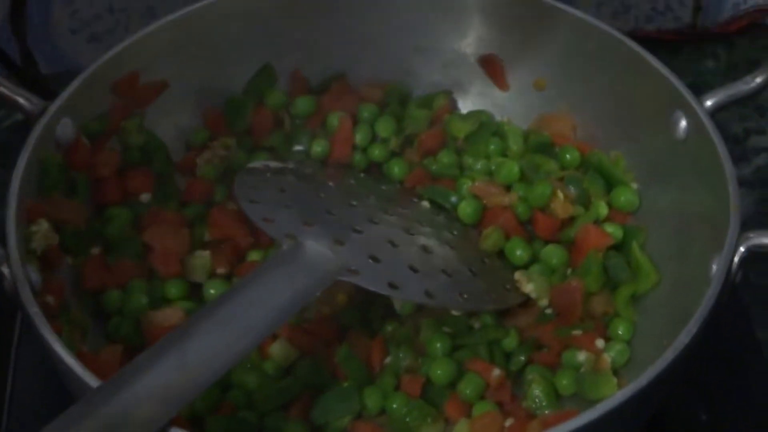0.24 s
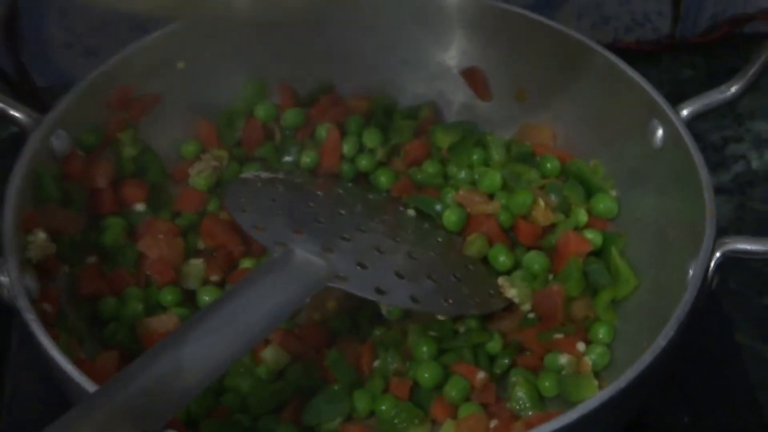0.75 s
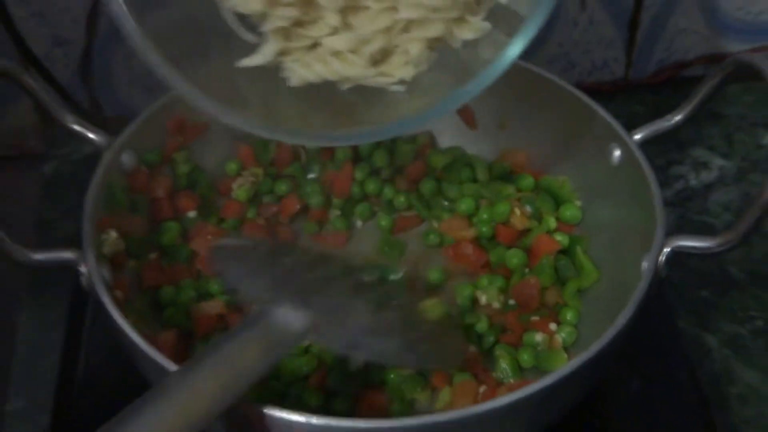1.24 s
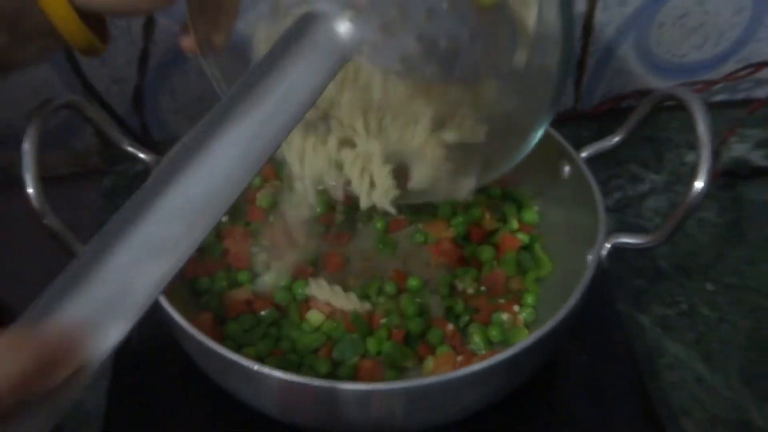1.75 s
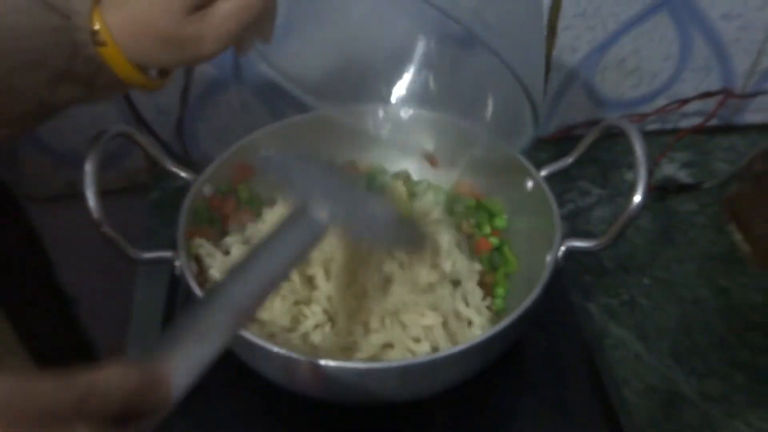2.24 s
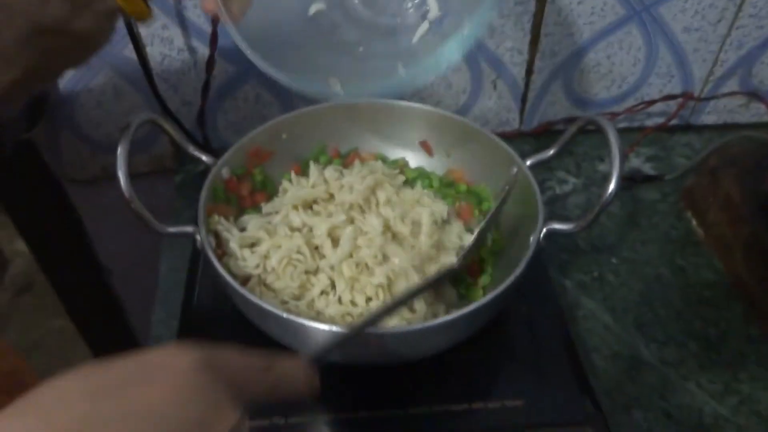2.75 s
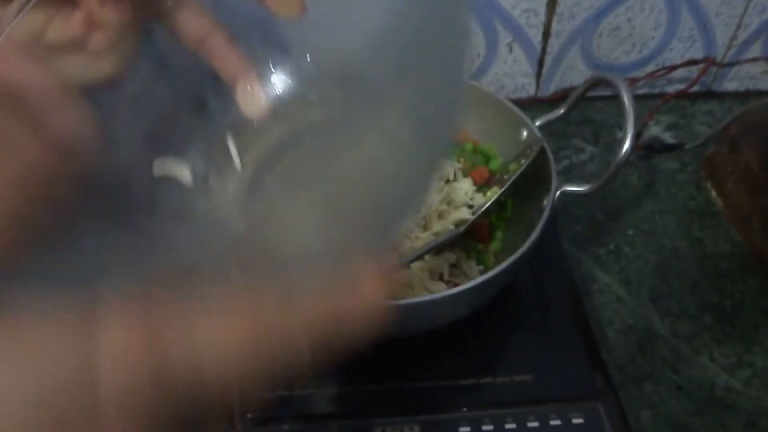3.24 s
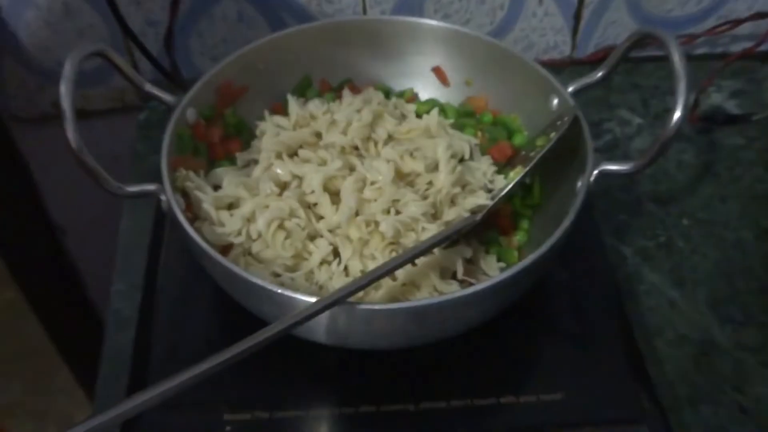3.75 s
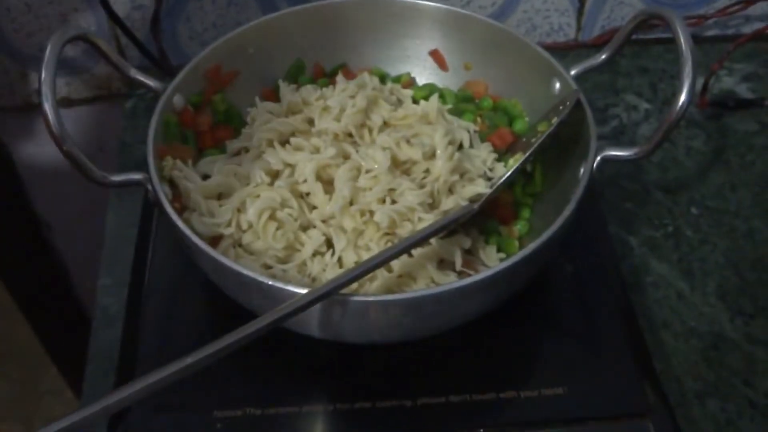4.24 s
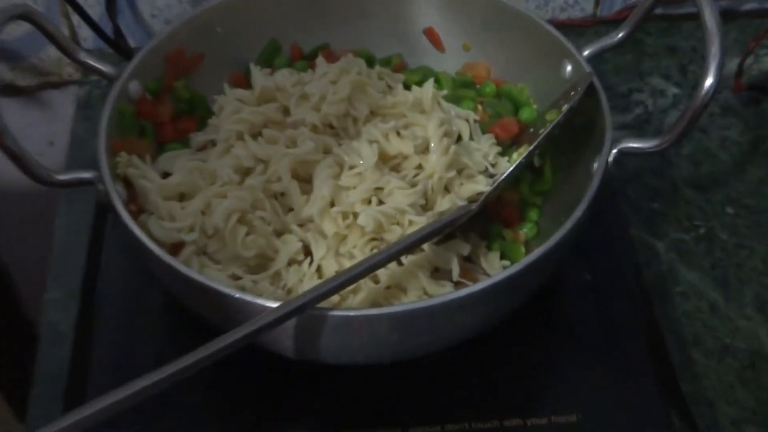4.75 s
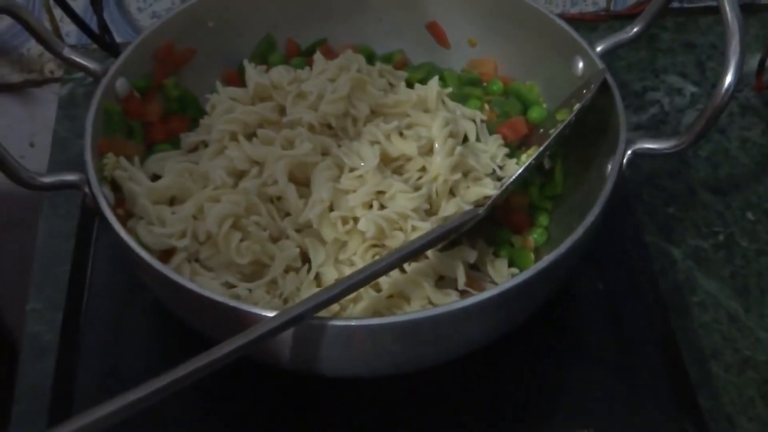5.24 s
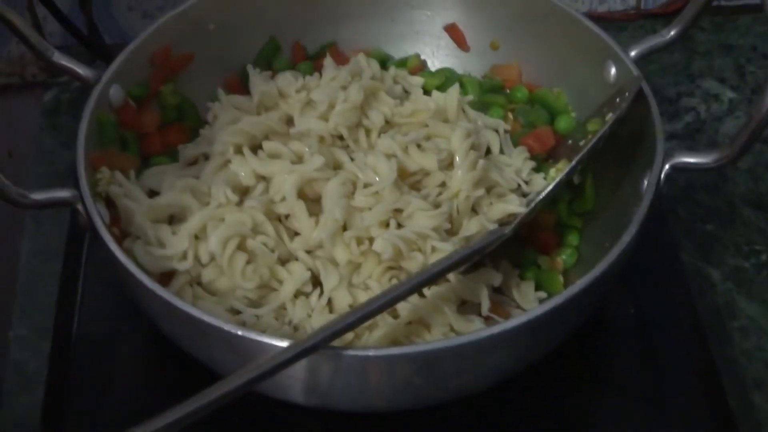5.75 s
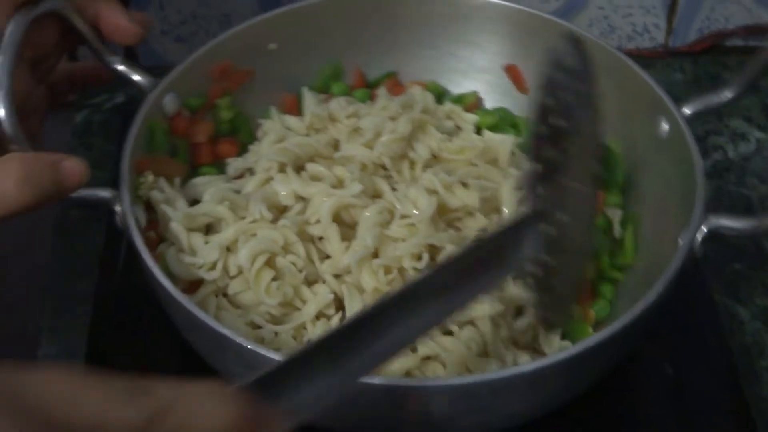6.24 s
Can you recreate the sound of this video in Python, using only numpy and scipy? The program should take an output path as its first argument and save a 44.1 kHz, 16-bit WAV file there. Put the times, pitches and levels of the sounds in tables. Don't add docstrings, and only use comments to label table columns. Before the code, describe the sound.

A close, slightly right-leaning stereo sound in a small tiled kitchen with short echoes. Oil fizzes densely and rather quietly from the start, with crisp single spits throughout, over a steady airy fan whir with a mid-low hum and faint hiss. Around 0.96 s the pan gets a sharp metallic tick and dull knock. At 1.83 s the skimmer clinks brightly on a glass bowl; from 2.0 s pasta slides out with a soft scrape and the sizzle surges. Another glass clink at 2.4 s, then skimmer and pan-wall clanks at 2.8-2.9 s amid stronger frying, which dips around 3.2 s and builds again. The bowl is set down at 4.2 s, a glass lands with a heavy, ringing thud at 5.0 s, a jar thumps at 5.28 s. Handle ticks at 5.9-6.0 s lead to bright skimmer clanks at 6.28 s and two short, gritty pan scrapes until 6.5 s.

```python
import sys
import numpy as np
from scipy import signal
from scipy.io import wavfile
from scipy.ndimage import uniform_filter1d

SR = 44100
rng = np.random.default_rng(int(sys.argv[2]) if len(sys.argv) > 2 else 0)


def log_audio(samples):
    frames = np.atleast_2d(samples).T
    limited = np.clip(frames, -1, 1)
    pcm = np.round(limited * 32767).astype(np.int16)
    wavfile.write(sys.argv[1], SR, pcm)


def gain_from_decibels(decibels):
    exponent = np.asarray(decibels, float) / 20
    return 10 ** exponent


N = 286650


def evened(x):
    return x / np.sqrt(np.mean(x ** 2) + 1e-20)


def read(points, hz):
    f, value = np.transpose(points)
    return np.interp(np.log(hz + 1), np.log(f + 1), value)


def add(mix, s, sound):
    part = mix[round(s * SR):][:len(sound)]
    part += sound[:len(part)]


def resonate(x, hz, width):
    r, turn = np.exp(-np.pi * width / SR), np.exp(2j * np.pi * hz / SR)
    return 2 * signal.lfilter([1 - r], [1, -r * turn], x).real


# pitch in Hz, likeness (1 = the same).
SAME = [(40, 0.84), (250, 0.99), (1000, 0.92), (4000, 0.92), (7500, 0.92), (8500, 0.8), (15000, 0.55)]


def field(z, db, swell_db, patchy_db):
    hz = np.fft.rfftfreq(512, 1 / SR)
    patches = rng.standard_normal(z.shape[:0:-1]).T
    patches = uniform_filter1d(patches, size=7, axis=0)
    patches = evened(uniform_filter1d(patches, size=16, axis=1))
    flicker = evened(uniform_filter1d(rng.standard_normal(z.shape[2]), size=12))
    same = np.clip(read(SAME, hz), -1, 1)[:, None]
    mid = np.sqrt((1 + same) / 2) * z[0]
    side = np.sqrt((1 - same) / 2) * z[1]
    gain = gain_from_decibels(db + swell_db * flicker + patchy_db * patches)
    pair = np.array([mid + side, mid - side]) * gain
    return signal.istft(pair, nperseg=512, noverlap=384)[1][:, :N]


# time in seconds, level in dB.
HEAT = [(0.0, -41.5), (0.72, -42), (1.77, -40.5), (2.0, -36.5), (2.045, -32.5), (2.21, -35), (2.645, -35),
        (2.67, -30.5), (2.775, -31), (2.84, -30.5), (3.15, -36.5), (3.46, -36.5), (3.78, -34),
        (5.01, -31.5), (5.36, -32.5), (6.3, -32), (6.46, -30), (6.5, -29)]
# pitch in Hz, strength in dB per Hz.
FIZZ = [(710, -17.5), (1200, -6.5), (1520, -10.5), (1850, -4.5), (2370, -6), (2840, -6.5), (3170, -3.5),
        (4570, -1.5), (5320, -4), (6250, -5), (7040, -11.5), (8100, -9), (9020, -7.5), (11900, -14),
        (15800, -18.5)]


def frying(per_s=7000, spread_db=3.5):
    size_db = spread_db * np.minimum(rng.exponential(1, (2, N)), 3.5)
    bursts = gain_from_decibels(size_db) * (rng.random((2, N)) < per_s / SR)
    bursts = evened(bursts * rng.choice([-1., 1.], (2, N)))
    bursts = bursts + 0.71 * rng.standard_normal((2, N))
    hz, t, z = signal.stft(evened(bursts), SR, nperseg=512, noverlap=384)
    heat_db = np.interp(t, *np.transpose(HEAT))
    top_db = np.interp(t, [1.95, 2.06], [18.5, 14])
    top = np.clip((hz[:, None] - 6000) / 2500, 0, 1)
    level_db = heat_db + (1 - top) * 10.43 + top * top_db
    return field(z, read(FIZZ, hz)[:, None] + level_db, swell_db=0.83, patchy_db=1.5)


def spit(db, hz, crack):
    t = np.arange(600) / SR
    bubble = np.sin(2 * np.pi * hz * t) * np.exp(-t * hz / 3.4)
    bubble = bubble * (1 - np.exp(-t * hz / .5))
    snap = 1.3 * np.exp(-t / 0.00022) + 0.49 * np.exp(-t / 0.0084)
    grit = uniform_filter1d(rng.standard_normal(600), size=2)
    return gain_from_decibels(db) * (bubble + abs(crack) * grit * snap)


# start in seconds, peak in dB, pitch in Hz, share of crack (0 to 1).
SPITS = [(0.0396, -26.5, 1504, 0.8), (0.0941, -14, 3330, 0.4), (0.141, -15.5, 3460, 0.24),
         (0.609, -13, 9600, 0.07), (0.6887, -15, 9150, 0.23), (0.6903, -19.5, 4730, 0.96),
         (0.884, -22, 3100, 0.6), (1.4375, -19.5, 5300, 0.4), (1.9288, -20, 4500, 0.7),
         (2.424, -18, 2580, 0.1), (3.555, -17, 3930, 0.5), (3.663, -17, 4030, 0.46),
         (3.6886, -14.5, 4830, 0.6), (3.6892, -24, 1910, 0), (3.7434, -10.5, 9810, 0.1),
         (4.0142, -8, 8400, 0.02), (4.087, -16, 4480, 0.24), (4.4284, -17, 4230, 0.2),
         (5.105, -14, 4890, 0.2), (5.2117, -16, 1980, 0.1), (5.2122, -22, 3400, .1), (4.9989, -8, 1960, 0),
         (5.138, -20, 4100, 0), (5.0035, -20.5, 600, 0), (5.013, -9, 1350, 0.1), (5.033, -11, 750, 0),
         (5.064, -18, 714, 0.1), (0.9637, -12, 4150, .1), (.9648, -13, 8150, 0), (2.818, -14, 2900, 0.6),
         (6.4425, -10, 2260, .15), (6.483, -10, 3600, 0), (1.09, -25, 1920, .1), (6.235, -11, 7800, 0.1),
         (4.344, -25, 4500, .2), (6.054, -20, 4130, 1), (6.123, -9, 8600, 0)]


def spits():
    oil = np.zeros(N)
    for s, *pop in SPITS:
        add(oil, s, spit(*pop))
    return oil


def knock(ring_db, clatter_db, t60, blow_hz, modes):
    t = np.arange(SR // 2) / SR
    low_hz, high_hz = blow_hz
    band = signal.butter(3, [low_hz, high_hz], "band", fs=SR, output="sos")
    grit = rng.standard_normal((1 + len(modes), len(t)))
    build = 1 - np.exp(-t * high_hz / 7.4) + 2.0 * np.exp(-t / 0.00029)
    level = 1 / np.sqrt((high_hz - low_hz) / (SR / 2))
    clatter = signal.sosfilt(band, level * grit[0] * build * gain_from_decibels(clatter_db - 60 * t / t60))
    chatter = 1 + .3 * evened(uniform_filter1d(grit, size=300, axis=1))[1:]
    ring = sum(gain_from_decibels(db - 60 * t / last) * shake * np.sin(2 * np.pi * tone * t)
               for (tone, db, last), shake in zip(modes, chatter))
    return clatter + gain_from_decibels(ring_db) * ring * (1 - np.exp(-t / 0.00098))


# lowest Hz, highest Hz.
BUMP_HZ = (246, 640)
THUD_HZ = (236, 1850)
RAP_HZ = (567, 4100)
DULL_HZ = (238, 1370)
TAP_HZ = (1240, 2820)
SLAP_HZ = (600, 1960)
PING_HZ = (2850, 4650)
CLINK_HZ = (1290, 14300)
TICK_HZ = (2960, 14400)
# pitch in Hz, level in dB, seconds to fall by 60 dB.
BOWL_BASE = [(478, -17.5, 0.056), (298, -29.5, .15)]
BOWL_EDGE = [(4720, -16, .03)]
BOWL_ROCK = [(1540, -29, .12), (4000, -25, .12), (3300, -31, .15), (510, -39, 0.15)]
BOWL_RIM = [(2570, -26.5, .16), (3480, -29, 0.1), (3700, -29, .15), (4750, -21, 0.068), (5350, -29, .1),
            (5590, -26, .14), (8150, -27, .12), (8950, -21, .1), (9600, -25, .1), (10250, -21, 0.1),
            (11600, -30, .1), (12730, -28, .05), (13400, -22, .05)]
RIM_BOUNCE = [(2530, -26, 0.16), (3470, -26, 0.21), (3700, -32, .12), (2900, -29, .1), (4800, -27, 0.053),
              (5590, -23, .15), (8160, -31, .2), (9670, -28, 0.091), (10650, -26, .1), (11620, -24, 0.1),
              (14500, -25, .05)]
BOWL = [(772, -28.5, 0.17), (1440, -23, 0.22), (2477, -20, 0.11), (2610, -25, 0.13), (3484, -26.5, 0.17),
        (4590, -23.5, 0.14), (6300, -33, .1), (7900, -27, .1), (9070, -14.5, 0.079), (10500, -22, 0.088),
        (11440, -23, 0.061), (13600, -30, 0.067)]
BOWL_FREED = [(772, -32, 0.46), (1414, -30, 0.38), (2010, -30, 0.5), (2520, -19.5, 0.16), (2600, -29, .2),
              (4480, -38, 0.17), (8140, -25, 0.2), (9800, -28, 0.27)]
PAN = [(1034, -33, 0.17), (2013, -32, 0.17), (3180, -27, 0.22), (3320, -28, 0.091), (3330, -31, 0.12),
       (3900, -28, 0.046), (4290, -27, 0.11), (4720, -29, 0.084), (6200, -28, 0.048), (8100, -18.5, 0.034),
       (8700, -27, .18), (9290, -21, 0.11), (9500, -25, 0.12), (12600, -26, .05)]
PAN_TOUCH = [(5220, -37, 0.087), (5780, -33, .08), (8700, -42, .05), (14800, -33, .05)]
PAN_WALL = [(797, -37, 0.39), (1470, -20, 0.07), (1805, -18, 0.064), (2022, -18.5, 0.072), (2030, -33, .1),
            (2260, -21.5, 0.07), (2790, -32, 0.13), (3207, -25.5, 0.18), (4040, -19.5, .04),
            (4720, -18.5, 0.046)]
JAR = [(750, -17.5, 0.037)]
GLASS = [(1337, -18, 0.25), (696, -14, 0.24), (348, -10, 0.098)]
GLASS_RIM = [(4890, -25.5, 0.15), (4880, -38, 0.092), (8100, -29, 0.083)]
SKIMMER = [(1350, -29, 0.2), (2323, -20.5, 0.38), (2220, -33, 0.46), (2990, -28, 0.18), (5220, -27, .15),
           (5580, -25, .1), (6800, -34, .1), (6830, -27, .1), (7940, -21, 0.1), (14600, -28, .07)]
SKIMMER_BOUNCE = [(2303, -19, 0.2), (3230, -26, 0.072), (3850, -31, .1), (5100, -31, .1), (7010, -28, .08),
                  (7950, -29, .1)]
SKIMMER_EDGE = [(3500, -24, 0.15), (4100, -17, .03), (4500, -34, .1), (5210, -20, 0.2), (5820, -25, 0.16),
                (6900, -18.5, 0.21), (10200, -20, 0.095), (11000, -22, 0.11), (11800, -28, .06),
                (13000, -25, .05)]
EDGE_BOUNCE = [(1036, -30.5, .15), (2260, -25, 0.086), (3350, -23, .16), (5130, -27, .08),
               (5810, -20, 0.11), (6960, -34, .2), (408, -36, .3)]
HANDLE = [(1120, -29, .06), (3100, -31, 0.16), (4100, -27, .06), (8400, -19, .05), (7340, -17, 0.049),
          (9330, -23, 0.12)]
HANDLE_BOUNCE = [(1090, -26, 0.095), (2490, -22, 0.035), (3130, -30, .08), (6100, -18, 0.035),
                 (7500, -25, 0.049), (8300, -24, .04)]
HANDLE_TIP = [(9340, -18, 0.025), (8700, -15.5, 0.022), (7600, -15, 0.025), (13000, -24, 0.045),
              (4100, -26, .06)]
BLADE_LOW = [(1600, -25.5, .15), (282, -31.5, 0.32)]
BLADE_FLAT = [(750, -21, 0.17), (1014, -28, 0.097), (1240, -30, 0.088), (2340, -29, 0.074),
              (5240, -22, 0.085)]
BLADE_TIP = [(2100, -28, 0.089), (3550, -23, 0.092), (5240, -33, 0.084), (6800, -25, .09)]
BLADE_HEEL = [(2090, -21.5, 0.086), (2450, -22, .1), (1350, -32, .12), (3400, -30, .1)]
# start in seconds, ring in dB, clatter in dB, seconds for the clatter to fall by 60 dB,
# kind of blow (Hz band), tones that ring.
BLOWS = [(0.9647, 0, -20, 0.027, TICK_HZ, []), (.964, 1, -22, 0.076, PING_HZ, PAN),
         (0.989, 0, -24, 0.066, DULL_HZ, []), (1.014, 0, -30, 0.31, THUD_HZ, []),
         (1.030, 2, -35, 0.092, TICK_HZ, PAN_TOUCH), (1.833, 0, -21, 0.1, CLINK_HZ, BOWL_RIM),
         (1.849, -3.5, -24.5, 0.3, CLINK_HZ, RIM_BOUNCE), (1.897, -14, -34, .15, TICK_HZ, BOWL_RIM),
         (2.403, 0, -19, 0.087, CLINK_HZ, [(2490, -21, .1)]), (2.7905, 0, -17, 0.055, TICK_HZ, []),
         (2.804, -3, -28, 0.1, CLINK_HZ, SKIMMER_BOUNCE), (2.039, 0, -31.5, 0.61, TICK_HZ, []),
         (2.396, 0.5, -18, 0.1, CLINK_HZ, BOWL), (2.434, -4, -35, 0.29, CLINK_HZ, BOWL_FREED),
         (2.791, -1, -24.5, 0.095, CLINK_HZ, SKIMMER), (2.897, 1, -18, 0.14, TAP_HZ, PAN_WALL),
         (2.898, 0, -24.5, 0.2, DULL_HZ, []), (4.225, 1.5, -27, 0.27, BUMP_HZ, BOWL_BASE),
         (4.226, -2, -25, 0.2, TICK_HZ, BOWL_EDGE), (4.230, 0, -25, 0.24, RAP_HZ, []),
         (4.246, 0, -29, 0.23, RAP_HZ, BOWL_ROCK), (4.977, 0, -28, 0.3, RAP_HZ, []),
         (4.998, -5.5, -14.5, 0.23, THUD_HZ, GLASS), (5.012, 0, -17.5, 0.24, THUD_HZ, []),
         (5.002, 1.5, -42, .1, PING_HZ, GLASS_RIM), (5.018, -0.5, -44, .1, PING_HZ, GLASS_RIM),
         (5.042, -6, -43, .1, PING_HZ, GLASS_RIM), (5.033, 0, -29, .15, SLAP_HZ, []),
         (5.048, 0, -24, 0.36, SLAP_HZ, []), (5.275, 3.5, -21, 0.24, DULL_HZ, JAR),
         (5.925, 2.5, -24.5, 0.11, CLINK_HZ, HANDLE), (5.929, 0, -22.5, 0.1, RAP_HZ, HANDLE_BOUNCE),
         (6.170, 0, -32, .2, PING_HZ, []), (5.9975, -2, -23.5, 0.09, TICK_HZ, HANDLE_TIP),
         (6.276, -1.5, -19.5, 0.45, CLINK_HZ, SKIMMER_EDGE), (6.295, -1, -28, 0.18, RAP_HZ, EDGE_BOUNCE),
         (6.349, -3.5, -30, .1, THUD_HZ, BLADE_LOW), (6.376, -2.5, -30, .1, CLINK_HZ, BLADE_FLAT),
         (6.385, -3, -30, 0.092, RAP_HZ, [(2340, -27, .08), (5240, -23, .08)]),
         (6.401, 1.5, -34, .1, CLINK_HZ, BLADE_TIP), (6.442, -14, -33, 0.067, RAP_HZ, BLADE_FLAT),
         (6.476, -7, -34, .06, RAP_HZ, BLADE_HEEL), (6.367, 0, -33, .15, TICK_HZ, []),
         (6.464, -2, -36, .1, TAP_HZ, BLADE_HEEL), (6.491, 0, -37, .1, RAP_HZ, BLADE_HEEL)]


def knocks():
    near = np.zeros(N)
    muffled_s = 2.422
    for s, *blow in BLOWS:
        sound = knock(*blow)
        if s < muffled_s:
            sound[round((muffled_s - s) * SR):] *= gain_from_decibels(-27)
        add(near, s, sound)
    return near


def scrape(rows, peaks):
    s, db = np.transpose(rows)
    t = np.arange(s[0], s[-1], 1 / SR)
    jerks = evened(uniform_filter1d(rng.standard_normal(len(t)), size=60))
    grit = rng.standard_normal(len(t)) * gain_from_decibels(2.0 * jerks)
    body = sum(gain_from_decibels(top_db) * evened(resonate(grit, hz, width)) for hz, width, top_db in peaks)
    rasp = evened(resonate(grit, 4200, 2900))
    fade_in = np.clip((t - s[0]) / 0.0048, 0, 1)
    return s[0], gain_from_decibels(np.interp(t, s, db)) * evened(evened(body) + 1.1 * rasp) * fade_in


# time in seconds, level in dB.
SCRAPE = [
    [(6.345, -35), (6.385, -23), (6.425, -27.5), (6.44, -31)],
    [(6.44, -23.5), (6.5, -30)],
    [(2.04, -40), (2.3, -39.5), (2.62, -44)],
]
# pitch in Hz, width in Hz, level in dB.
SCRAPED = [
    [(715, 20, -2), (1240, 40, -8), (2400, 93, 2), (2850, 110, 3), (3470, 99, -3), (3800, 47, -5),
     (5330, 38, 0), (6850, 91, 5), (9200, 39, -17)],
    [(720, 28, -4), (2220, 150, 8), (3400, 29, 3), (4230, 36, -17), (5300, 96, -13), (7000, 36, 5),
     (8110, 165, -20), (9800, 56, -16)],
    [(1940, 100, 5), (1400, 80, -6), (4500, 300, -3)],
]


def scrapes():
    near = np.zeros(N)
    for rows, peaks in zip(SCRAPE, SCRAPED):
        add(near, *scrape(rows, peaks))
    return near


def boom(db, t60):
    t = np.arange(SR // 2) / SR
    shudder = resonate(rng.standard_normal(len(t)), 95, 75)
    shudder = evened(resonate(shudder, 95, 75))
    return gain_from_decibels(db - 60 * t / t60) * shudder * (1 - np.exp(-t / 0.0095))


# start in seconds, level in dB, seconds to fall by 60 dB.
BOOMS = [
    (1.0, -59, 1.0),
    (2.4, -62, 0.35),
    (2.901, -63, .5),
    (4.231, -62, 0.88),
    (2.79, -62, .4),
    (5.001, -46.5, 0.45),
    (5.28, -55, 0.6),
    (6.33, -60, 0.65),
]


def booms():
    counter = np.zeros(N)
    for s, *shudder in BOOMS:
        add(counter, s, boom(*shudder))
    return counter


# pitch in Hz, seconds to fall by 60 dB.
KITCHEN = [(200, 0.22), (1500, 0.25), (6000, 0.24), (15000, 0.071)]


def kitchen(x):
    taps = np.zeros((2, SR // 2))
    at = np.arange(200, SR // 2 - 20, 20)
    at = at + rng.integers(0, 20, (2, len(at)))
    np.put_along_axis(taps, at, rng.choice([-1., 1.], at.shape), 1)
    taps = taps + 0.64 * taps[::-1]
    hz, t, z = signal.stft(taps, SR, nperseg=256)
    tail = signal.istft(z * gain_from_decibels(-60 * t / read(KITCHEN, hz)[:, None]), SR, nperseg=256)[1]
    return signal.fftconvolve(x[None], tail / np.linalg.norm(tail[0]), axes=1)[:, :N]


# pitch in Hz, strength in dB per Hz.
WHIR = [(20, -52), (45, -33), (85, -25), (150, -28), (190, -19), (280, -6.5), (403, -2.5), (479, -7.5),
        (805, -5), (1020, -6.5), (1250, -9.5), (2040, -11.5), (2700, -41), (4500, -60)]
# pitch in Hz, width of the wavering in Hz, level in dB.
HUM = [(202.8, 7.6, -61), (409.7, 15.5, -43), (808.6, 28, -49), (1019.5, 27, -48.5), (346, 11, -60),
       (544, 40, -55)]


def fan():
    air = np.fft.rfft(rng.standard_normal((2, N)))
    air = evened(np.fft.irfft(air * gain_from_decibels(read(WHIR, np.fft.rfftfreq(N, 1 / SR))), N))
    z = signal.stft(air, SR, nperseg=512, noverlap=384)[2]
    rush = field(z, -39.5, swell_db=1.32, patchy_db=0.0)
    t, tones = np.arange(N) / SR, 0
    for hz, width, db in HUM:
        waver = resonate(rng.standard_normal(N), hz, width)
        waver = evened(resonate(waver, hz, width))
        tones = tones + gain_from_decibels(db) * (0.5 * waver + np.sin(2 * np.pi * (hz * t + rng.random())))
    return rush + tones


def scene():
    oil = spits()
    near = knocks() + scrapes()
    direct = near * gain_from_decibels(np.array([[-.3], [.3]])) + oil * gain_from_decibels(np.array([[-1.5], [1.5]]))
    direct = direct + np.array([[.2], [-.2]]) * np.gradient(near)
    pan = direct + gain_from_decibels(-9.0) * kitchen(near + 0.63 * oil) + frying()
    small = signal.butter(5, 215, "high", fs=SR, output="sos")
    return signal.sosfilt(small, pan) + booms() + fan()


def top_cut(x):
    return signal.sosfilt(signal.butter(12, 16480, fs=SR, output="sos"), x)


def record(dry):
    treble = signal.butter(2, 7000, "high", fs=SR, output="sos")
    hiss = signal.sosfilt(treble, rng.standard_normal(dry.shape))
    heard = dry * gain_from_decibels(np.array([[-.35], [.35]])) + gain_from_decibels(-43.5) * hiss
    limit = signal.firwin(767, 15760, window=("kaiser", 9), fs=SR)
    return top_cut(signal.oaconvolve(heard, limit[None], "same"))


dry = scene()
out = record(dry)
log_audio(out)
```